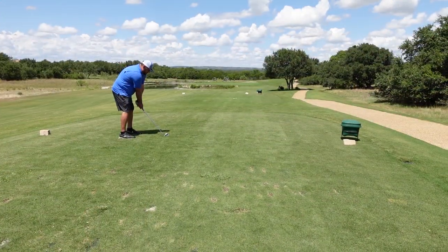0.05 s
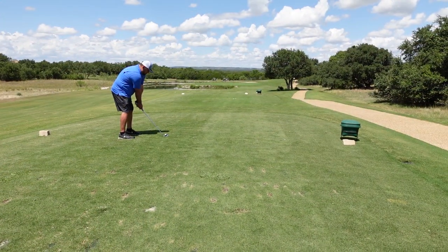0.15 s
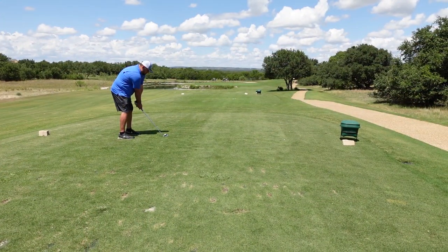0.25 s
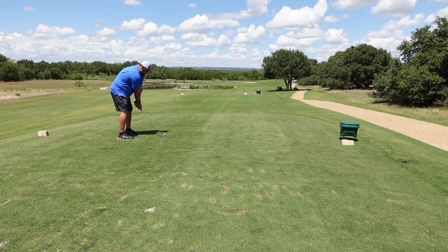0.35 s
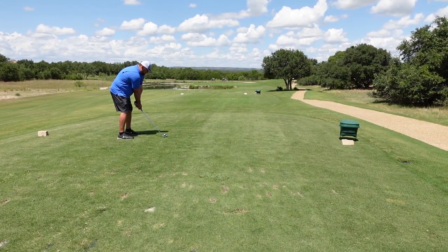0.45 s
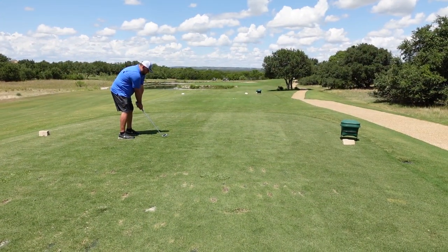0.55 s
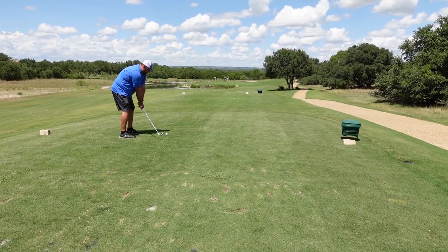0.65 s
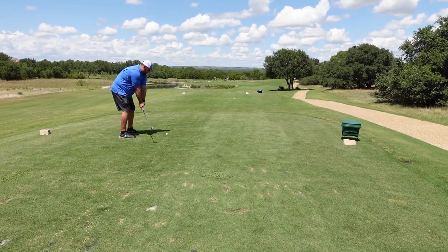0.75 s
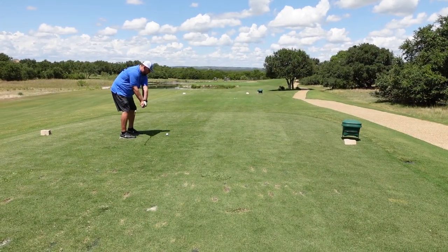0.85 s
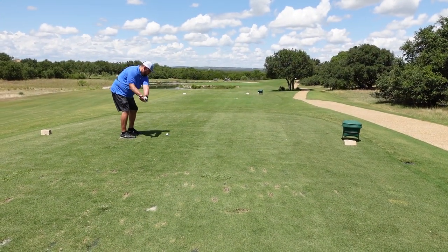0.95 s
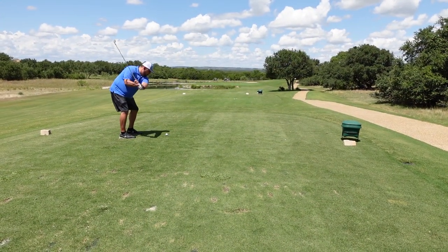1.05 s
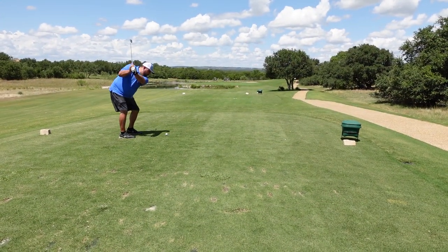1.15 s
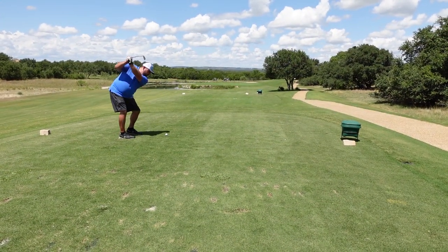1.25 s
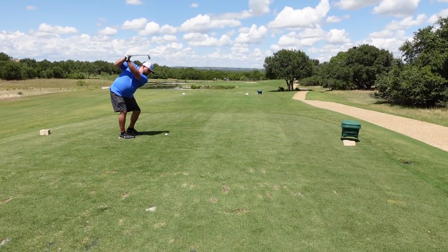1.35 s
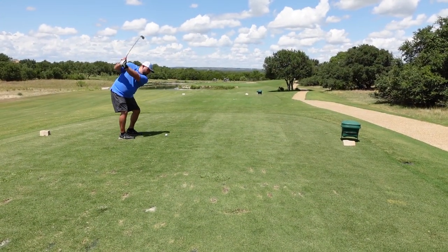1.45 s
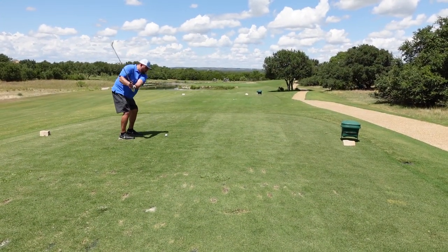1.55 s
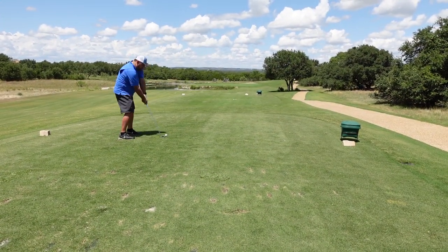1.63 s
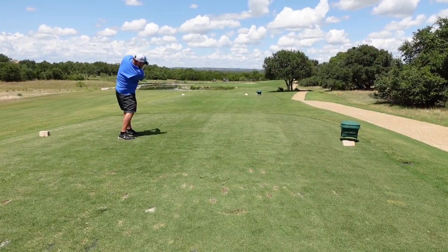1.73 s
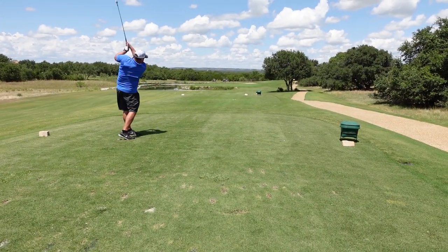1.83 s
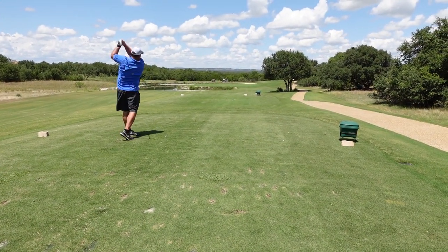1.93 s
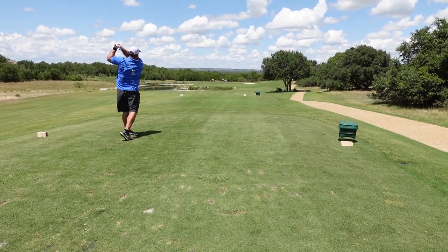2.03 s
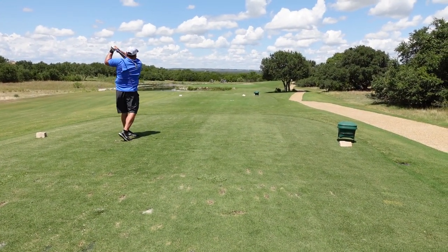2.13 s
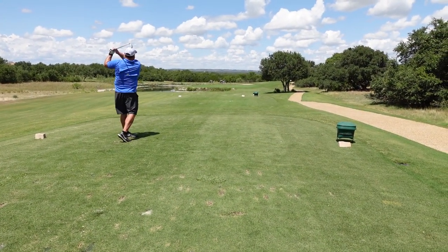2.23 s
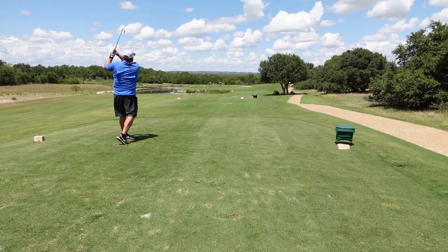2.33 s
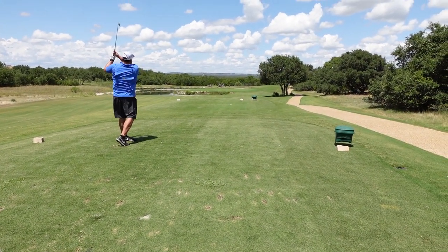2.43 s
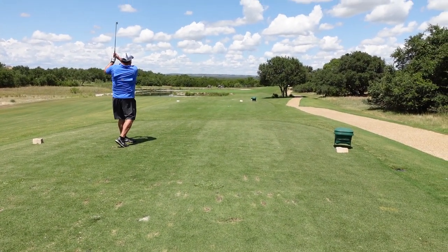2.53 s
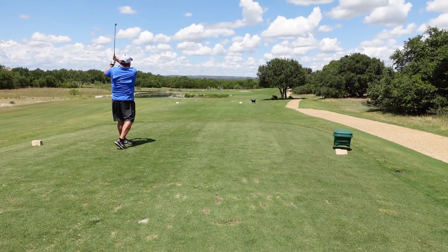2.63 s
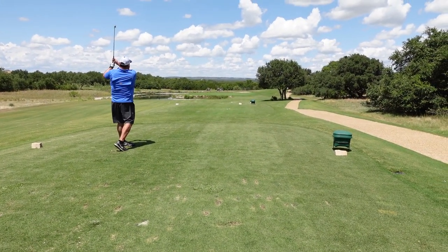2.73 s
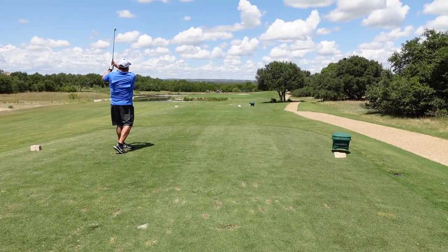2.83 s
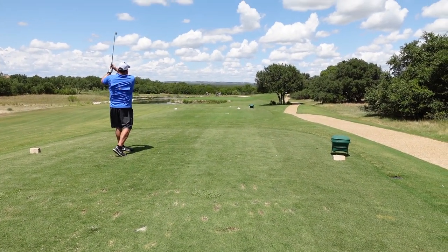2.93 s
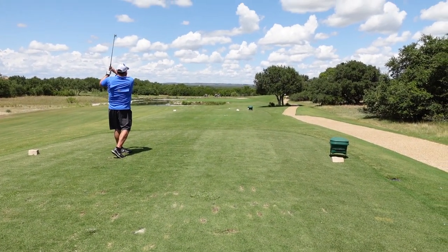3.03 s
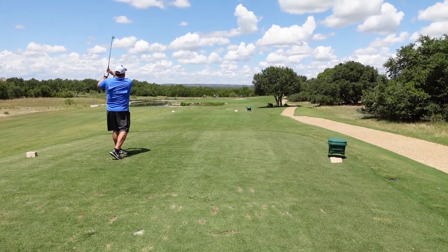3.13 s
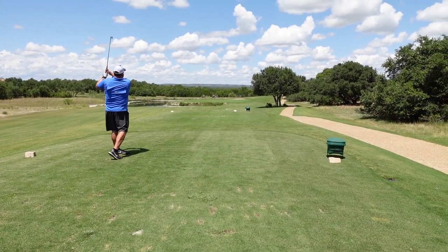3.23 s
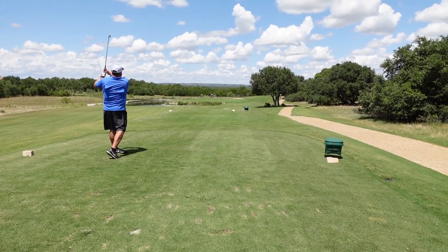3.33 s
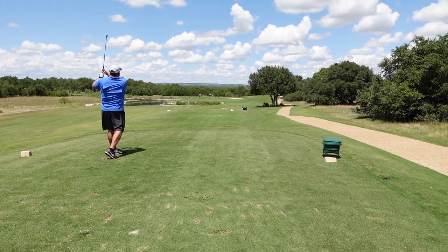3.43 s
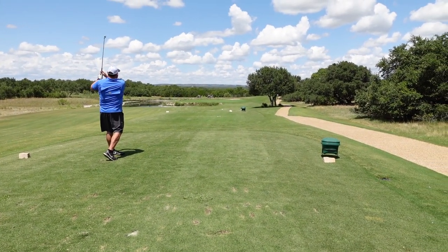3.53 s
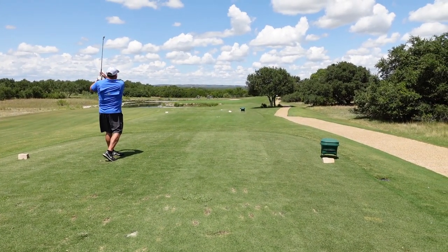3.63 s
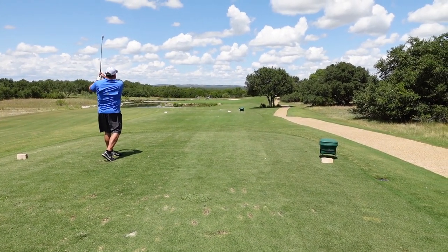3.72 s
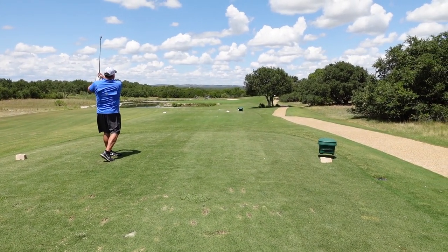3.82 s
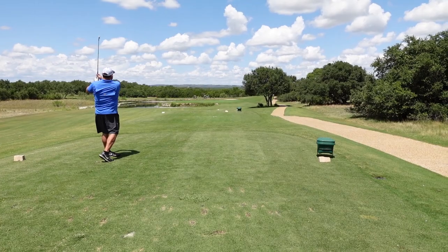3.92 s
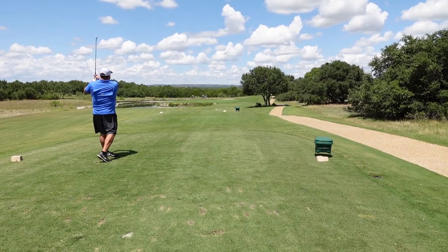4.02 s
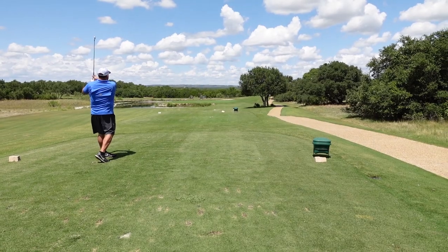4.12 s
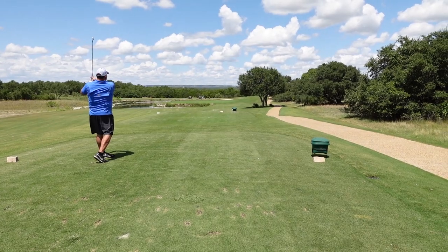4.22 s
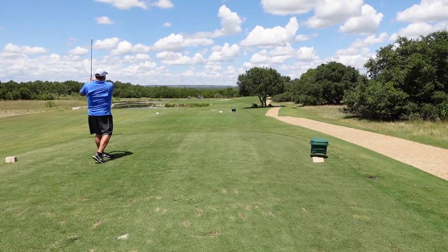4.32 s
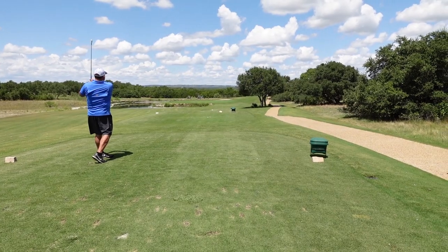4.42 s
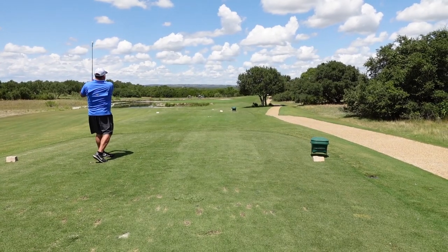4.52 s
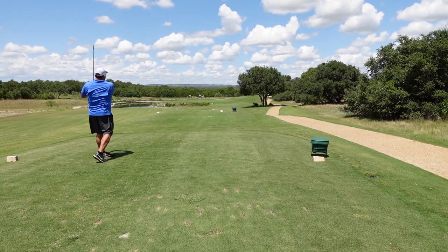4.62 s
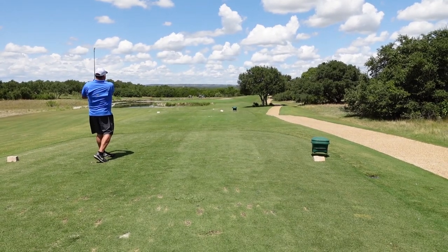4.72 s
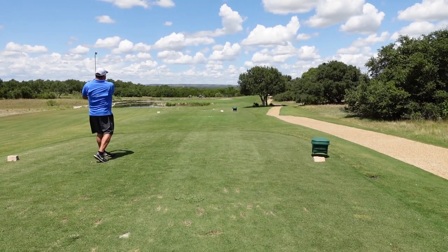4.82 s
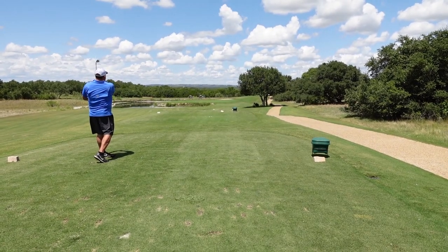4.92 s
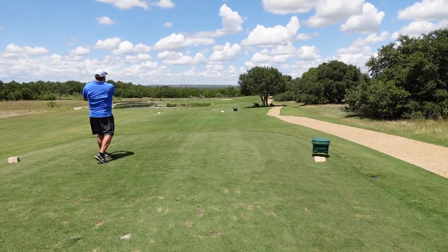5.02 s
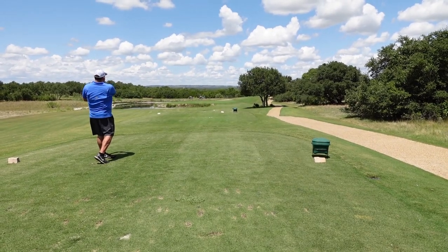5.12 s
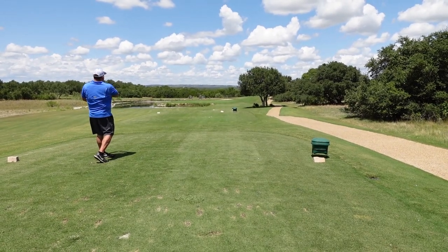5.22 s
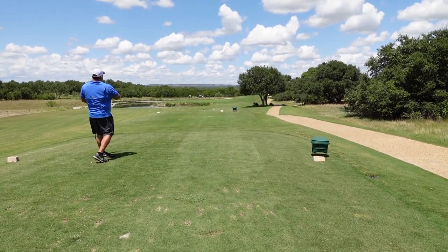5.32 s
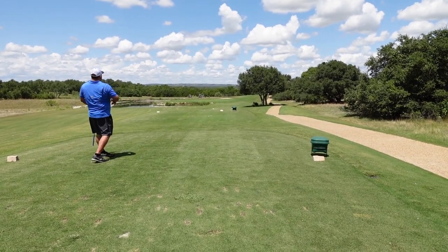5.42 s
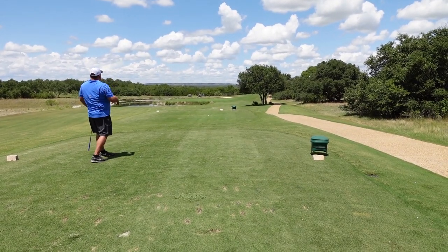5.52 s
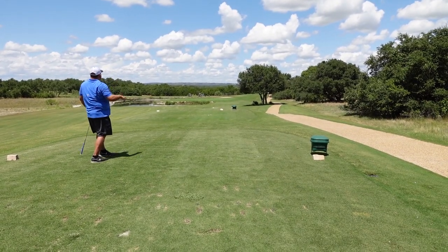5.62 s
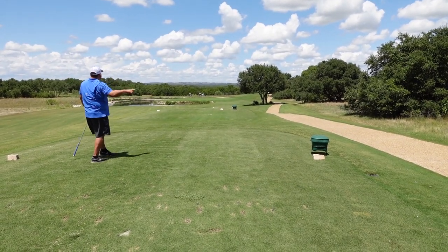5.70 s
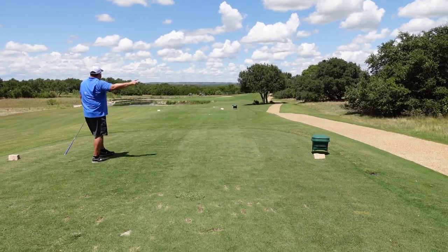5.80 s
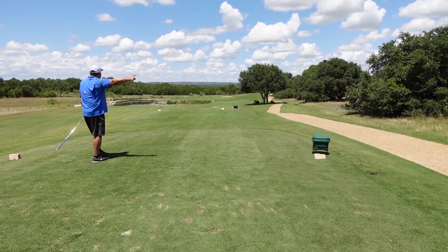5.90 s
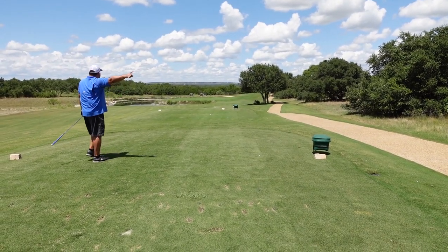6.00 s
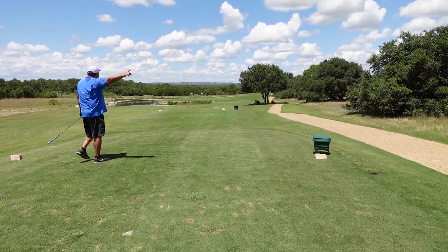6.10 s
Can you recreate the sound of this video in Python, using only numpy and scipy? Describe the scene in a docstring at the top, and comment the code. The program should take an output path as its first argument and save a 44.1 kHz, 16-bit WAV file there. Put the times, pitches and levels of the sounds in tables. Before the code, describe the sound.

Stereo outdoor scene: a low, nearly steady hush of far wind and traffic, with a small bird chirping in brief upward runs at left. A shaft whooshes and hums for an instant, then club hits ball with one bright, hard clack that slightly overloads the microphone. Grainy soil noise and ringing echoes from bushes at right fade quickly, leaving quiet air and faint dry ticks.

```python
"""An iron club cracks against a golf ball on an open tee, a few metres from the microphone: one shock
rings face and ball. Before it the shaft swishes down and briefly hums; after it the head rips the turf.
The crack comes back from bushes and trees on the right as bursts of noise with the flying ball's ring.
Faint dry ticks follow on the grass, and on the left a small bird chips in quick runs of upslides,
over the nearly steady noise of distant air."""
import sys
import numpy as np
from scipy import signal
from scipy.fft import rfft, irfft, next_fast_len
from scipy.io import wavfile

SR = 44100
rng = np.random.default_rng(int(sys.argv[2]) if len(sys.argv) > 2 else 0)


def dump(signal):
    """Clip the signal to [-1, 1] and save it as 16-bit WAV at the path in sys.argv[1]."""
    limited = np.clip(np.atleast_2d(signal).T, -1, 1)
    pcm = np.round(limited * 32767).astype(np.int16)
    wavfile.write(sys.argv[1], SR, pcm)


N = 271479
IMPACT_S = 1.7468

# colour of the broadband snap at contact: pitch_hz [Hz], level_db [dB per Hz]
SNAP_COLOUR = [(30, -46), (100, -22), (170, -10), (300, -6.5), (460, -22), (560, -5), (680, -3),
               (2500, -19.5), (4300, -17), (7000, -26.5), (10000, -16.5), (13000, -25.5), (16000, -50.5)]


def from_db(db):
    """Decibels to gain."""
    return 10 ** (np.asarray(db) / 20)


def rms_one(x):
    """Scale to unit rms."""
    return x / np.sqrt(np.mean(x ** 2) + 1e-20)


def since(start_s):
    """Seconds elapsed after a moment, zero before it."""
    return np.maximum(np.arange(N) / SR - start_s, 0)


def bin_hz():
    """The frequency of every FFT bin."""
    return np.fft.rfftfreq(next_fast_len(N), 1 / SR)


def at_hz(points):
    """A spectrum at every FFT bin, straight on a log frequency axis."""
    hz, value = np.transpose(points)
    return np.interp(np.log(bin_hz() + 1), np.log(hz), value)


def coloured(gain):
    """Noise of unit rms, shaped by a gain at every FFT bin."""
    size = next_fast_len(N)
    spectrum = rfft(rng.standard_normal(size)) * gain
    return rms_one(irfft(spectrum, size)[:N])


def drift(rate_hz):
    """Slow random wander of unit rms."""
    return coloured(1 / (1 + (bin_hz() / rate_hz) ** 2))


def panned(x, left_db):
    """Tip a sound, or each bin of its spectrum, towards the left."""
    return x * from_db(left_db * np.array([[.5], [-.5]]))


def stereo_noise(spectrum_db, likeness, left_db=0):
    """Stereo noise with a mid of unit rms; likeness is the correlation of the sides before panning."""
    size = next_fast_len(N)
    alike = np.clip(likeness, -.9, 1)
    mid, side = rfft(rng.standard_normal((2, size))) * from_db(spectrum_db)
    width = np.sqrt((1 - alike) / (1 + alike))
    spectra = mid + width * side * [[1], [-1]]
    pair = irfft(panned(spectra, left_db), size)[:, :N]
    return pair / np.std(pair.mean(axis=0))


def burst(start_s, rise_s, t60, hold_s=0):
    """An envelope that swells, holds and dies away by 60 dB in t60 seconds."""
    rise = 1 - np.exp(-since(start_s) / rise_s)
    decay = from_db(-60 * since(start_s + hold_s) / t60)
    return rise * decay


def resonances(table, hz):
    """Summed power of damped resonances at the given frequencies."""
    power = 0
    for centre, width, db in table:
        damping = hz * width
        power = power + (from_db(db) * damping) ** 2 / ((hz ** 2 - centre ** 2) ** 2 + damping ** 2)
    return power


def band(bottom_hz, top_hz):
    """A path's gentle loss of bass and treble, at every FFT bin."""
    hz = bin_hz()
    bass_loss = 1j * hz / (bottom_hz + 1j * hz)
    return bass_loss / (1 + 1j * hz / top_hz)


def causal_pulse(power):
    """Spectrum of the promptest unit-energy pulse with this power at each bin (minimum phase)."""
    size = next_fast_len(N)
    cepstrum = irfft(np.log(power / power.mean() + 1e-12), size)
    cepstrum[0] /= 2
    return np.exp(rfft(cepstrum[:size // 2], size))


def air(level_db=-59.9, waver_db=.35, waver_hz=3):
    """Far wind and traffic blend into coloured noise with a slight, slow waver."""
    # colour of the distant air: pitch_hz [Hz], level_db [dB per Hz]
    air_colour = [(15, -48), (25, -20), (64, -12), (110, -4.5), (150, 0), (200, -3.5), (380, -5.5),
                  (490, -3), (600, -5.5), (1050, -7.2), (2200, -13.3), (4400, -19), (8000, -22.5),
                  (15500, -24.5)]
    # its stereo width: pitch_hz [Hz], likeness [correlation of left and right]
    air_likeness = [(30, .35), (80, .65), (150, .68), (200, .28), (320, 0), (950, -.12), (2400, .05),
                    (15000, .1)]
    gain = from_db(level_db + waver_db * drift(waver_hz))
    return gain * stereo_noise(at_hz(air_colour), at_hz(air_likeness))


def bird(width_hz=380, sweep=.11, sweep_s=.0206, warble=.07, warble_hz=110, t60=.21,
         left_db=12, trim_db=-1.5):
    """Each chip is a quick run of upslides that climbs and smears in the leaves, differently on each side."""
    # bird chips: start_s [s], level_db [dB before the trim], pitch_hz [centre, Hz]
    chips = [(.459, -59.5, 7300), (.803, -57.5, 7300), (1.036, -60, 7340), (2.85, -59.5, 7020),
             (3.65, -62, 6960), (5.33, -60.5, 7300)]
    smear = np.array([drift(width_hz) + 1j * drift(width_hz) for side in range(2)]) / np.sqrt(2)
    out = 0
    # pace scales the speed of each chip's climb, upslides and decay
    for (start_s, db, hz), pace in zip(chips, rng.uniform(.8, 1.2, len(chips))):
        slides = signal.sawtooth(2 * np.pi * warble_hz * pace * since(start_s))
        climb = np.minimum(since(start_s) * pace / sweep_s, 1) - .5
        pitch = hz * (1 + sweep * climb + warble * slides)
        tone = np.exp(2j * np.pi * np.cumsum(pitch) / SR)
        envelope = from_db(db) * burst(start_s, rise_s=.0032, t60=t60 / pace)
        out = out + envelope * np.real(smear * tone)
    return panned(from_db(trim_db) * out, left_db)


def swish():
    """Eddies shed by the shaft: each whoosh swells as the club comes round and fades once it has passed."""
    # down through the ball, then up over the shoulder:
    # peak_s [s], level_db [dB], swell [dB per s], fade [dB per s]
    whooshes = [(1.747, -46, 215, 899.5), (1.865, -55.5, 131, 218.5)]
    # air torn by the shaft: pitch_hz [Hz], level_db [dB per Hz]
    swish_colour = [(50, -24), (150, -9), (380, -7.5), (580, -3.5), (850, -4.5), (2000, -7.5), (4000, -15),
                    (8000, -24), (15000, -36.5)]
    now = np.arange(N) / SR
    force = 0
    for peak_s, db, swell, fade in whooshes:
        force = force + from_db(db - np.maximum(swell * (peak_s - now), fade * (now - peak_s)))
    return force * stereo_noise(at_hz(swish_colour), likeness=.99)


def shaft_tone(start_s=1.708, level_db=-44, hz=580, rise_s=.014, t60=.08,
               waver=.05, waver_hz=70, flutter_db=2):
    """At full speed the shaft sheds its eddies in step and hums briefly, unsteady in pitch and level."""
    pitch = hz * (1 + waver * drift(waver_hz))
    hum = np.sin(2 * np.pi * np.cumsum(pitch) / SR)
    flutter = from_db(level_db + flutter_db * drift(waver_hz))
    return flutter * hum * burst(start_s, rise_s, t60, hold_s=IMPACT_S - start_s)


def strike(level_db=13, rebound=.72):
    """One shock rings face and ball, rebounds inside the head and is heard again off the ground."""
    # resonances of club face and ball: pitch_hz [Hz], width_hz [Hz], level_db [dB]
    clack = [(322, 37, -4), (680, 130, -5.5), (929, 107, -4.5), (1455, 180, 3.5), (1856, 81, 2.5),
             (2230, 260, 2), (2500, 120, -4), (2872, 115, 0.3), (3370, 115, 1.5), (3800, 230, -4),
             (4420, 200, -6.5), (4900, 170, -1), (5252, 150, 3.5), (5554, 130, -7.5), (6280, 300, -6.5),
             (7210, 170, -12), (7770, 190, -3.5), (8650, 250, -9), (9300, 330, -7), (10100, 200, -14),
             (11200, 600, -9), (12600, 537, -14)]
    # round trips of the shock through the head: delay_s [s]
    round_trips = [.000135, .000326]
    # direct path, then twice off uneven ground: delay_s [s], level_db [dB], bottom_hz [Hz], top_hz [Hz]
    crack_paths = [(0, 1, 20, 9170), (.00243, -7, 1410, 6280), (.00287, -11, 3050, 4270)]
    # where the crack sits: pitch_hz [Hz], left_db [left minus right, dB]
    crack_balance = [(700, -0.6), (2000, -0.9), (9500, 0), (12000, 3.5)]
    hz = bin_hz()
    pulse = -causal_pulse(from_db(at_hz(SNAP_COLOUR)) ** 2 + resonances(clack, hz))
    for trip_s in round_trips:  # all-pass: the shock spreads in time and keeps its colour
        lag = np.exp(-2j * np.pi * hz * trip_s)
        pulse = pulse * (lag - rebound) / (1 - rebound * lag)
    arrivals = 0
    for delay_s, db, bottom_hz, top_hz in crack_paths:
        delay = np.exp(-2j * np.pi * hz * (IMPACT_S + delay_s))
        arrivals = arrivals + from_db(db) * band(bottom_hz, top_hz) * delay
    spectra = panned(pulse * arrivals, at_hz(crack_balance))
    return from_db(level_db) * irfft(spectra, next_fast_len(N))[:, :N]


def ground_scatter(level_db=-30, t60=.033):
    """Uneven ground scatters a little of the crack into a short burst of noise."""
    noise = stereo_noise(at_hz(SNAP_COLOUR), likeness=.6)
    return from_db(level_db) * noise * burst(IMPACT_S, rise_s=.0003, t60=t60)


def crack(bass_hz=95):
    """The strike and its ground scatter, which carry little bass."""
    bass_cut = signal.butter(2, bass_hz, "high", fs=SR, output="sos")
    return signal.sosfilt(bass_cut, strike() + ground_scatter())


def turf(start_s=1.752, level_db=-44.5, rise_s=.0015, t60=.22, grain_db=3, grain_hz=150):
    """The head digs in after the ball: a dull, grainy rip of soil."""
    # colour of the divot: pitch_hz [Hz], level_db [dB per Hz]
    soil = [(40, -22), (70, -6), (120, -1), (300, 0), (600, -3), (1500, -8.5), (5000, -15.5), (10000, -22),
            (15000, -33)]
    grain = from_db(level_db + grain_db * drift(grain_hz))
    return grain * burst(start_s, rise_s, t60) * stereo_noise(at_hz(soil), likeness=.7)


def echoes(grain_db=2.1, grain_hz=240):
    """Things on the right scatter the crack back; the flying ball's ring is Doppler-shifted in each echo."""
    # from things beside the tee out to bushes and trees: start_s [s], level_db [dB], rise_s [s],
    # hold_s [s], t60 [s], doppler [pitch ratio], ring_db [dB], bottom_hz [Hz], top_hz [Hz],
    # aside [share of the far-right balance], likeness [left-right correlation]
    echo_table = [(1.762, -31.5, .0003, .002, 0.027, 0.87, 3, 700, 2200, .85, .9),
                  (1.7654, -37, 0.00064, .003, .045, 1.01, -6, 2002, 11990, 0.99, .8),
                  (1.781, -42.5, .003, 0.015, .07, 1.04, -1, 200, 15990, 1.1, .6),
                  (1.806, -48, .003, 0.023, 0.19, 1.07, -0.5, 150, 10000, 1.06, 0.4),
                  (1.846, -53.5, .004, .015, .12, 1.1, -3, 150, 4000, 0.8, .5),
                  (1.891, -54.5, .008, 0.029, 0.4, 1.22, -8, 200, 2400, 0.34, 0.6)]
    # the ball's ring as it is thrown sideways: pitch_hz [Hz], width_hz [Hz], level_db [dB]
    ball_ring = [(2950, 290, 10.5), (4530, 190, 15.5), (5900, 350, 5)]
    # the scattered snap under that ring: pitch_hz [Hz], level_db [dB per Hz]
    scattered_snap = [(80, -8), (300, 1.5), (1600, 0.5), (2300, -1), (4000, -5.5), (6800, -4.5), (8000, -1),
                      (9200, -2), (10200, -7), (12500, -10), (15000, -23)]
    # a sound from the far right: pitch_hz [Hz], left_db [left minus right, dB]
    right_balance = [(600, 0), (1900, -3.5), (3100, -8.5), (4800, -11.5), (8500, -11), (12000, -5.5)]
    out = 0
    for start_s, db, rise_s, hold_s, t60, doppler, ring_db, bottom_hz, top_hz, aside, likeness in echo_table:
        ring = from_db(ring_db) ** 2 * resonances(ball_ring, bin_hz() / doppler)
        power = from_db(at_hz(scattered_snap)) ** 2 + ring
        colour_db = 10 * np.log10(power * np.abs(band(bottom_hz, top_hz)) ** 2 + 1e-12)
        noise = stereo_noise(colour_db, likeness, aside * at_hz(right_balance))
        out = out + from_db(db) * burst(start_s, rise_s, t60, hold_s) * noise
    return out * from_db(grain_db * drift(grain_hz))


def ticks(t60=.055):
    """Small dry ticks on the grass: short bursts of bright noise."""
    # ticks: start_s [s], level_db [dB]
    tick_table = [(2.106, -60), (2.2, -59.5), (4.975, -63)]
    # colour of dry grass underfoot: pitch_hz [Hz], level_db [dB per Hz]
    grass = [(120, -8), (400, -5.5), (1000, -4.5), (2000, 4), (3200, -8.5), (5500, -2), (8500, -3),
             (11000, -16), (15000, -29)]
    envelope = sum(from_db(db) * burst(start_s, rise_s=.001, t60=t60) for start_s, db in tick_table)
    return envelope * stereo_noise(at_hz(grass), likeness=.8)


def scene():
    """The shot in its open surroundings."""
    shot = swish() + shaft_tone() + crack() + turf() + echoes() + ticks()
    return air() + bird() + shot


def record(dry, bass_hz=140, top=.92, cutoff_hz=15700):
    """The crack overloads the microphone, adding brief mid and treble distortion; the top is cut."""
    limited = dry / (1 + (dry / top) ** 6) ** (1 / 6)  # top: limit as a share of full scale
    bass_cut = signal.butter(4, bass_hz, "high", fs=SR, output="sos")
    distortion = signal.sosfilt(bass_cut, limited - dry + 1e-18)  # tiny offset keeps the filter fast
    top_cut = signal.ellip(10, .1, 80, cutoff_hz, fs=SR, output="sos")
    return signal.sosfilt(top_cut, dry + distortion)


dry = scene()
out = record(dry)
dump(out)
```